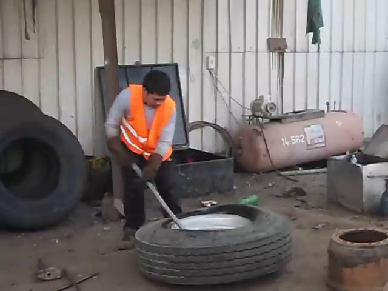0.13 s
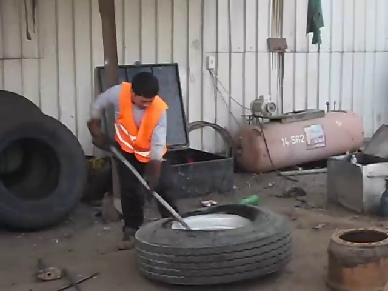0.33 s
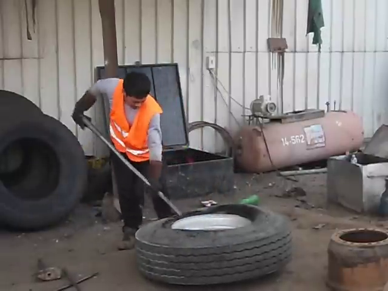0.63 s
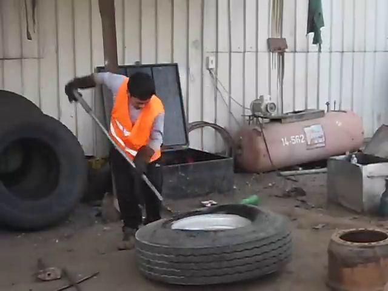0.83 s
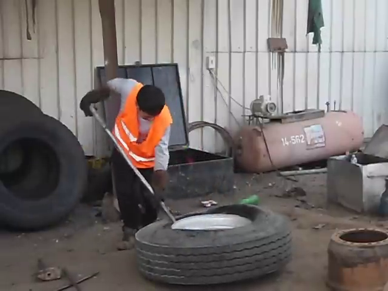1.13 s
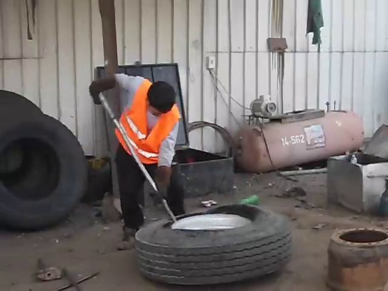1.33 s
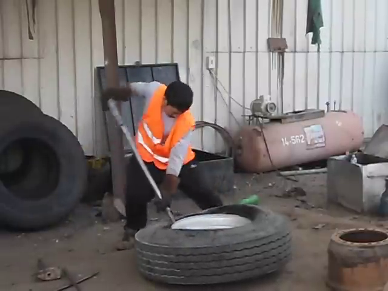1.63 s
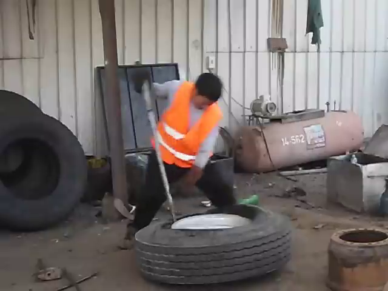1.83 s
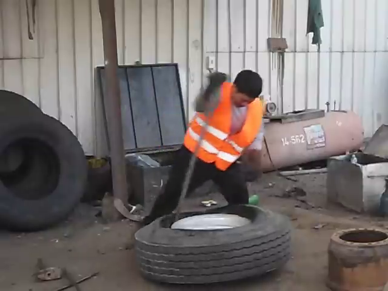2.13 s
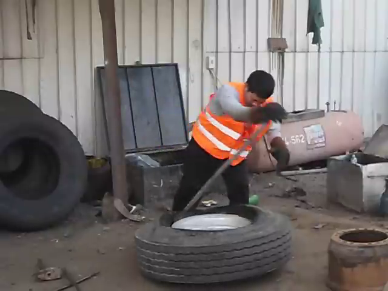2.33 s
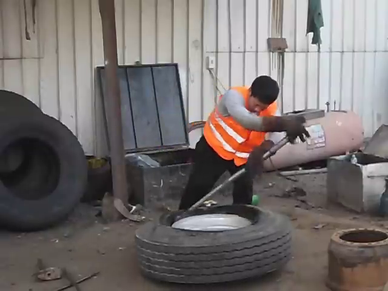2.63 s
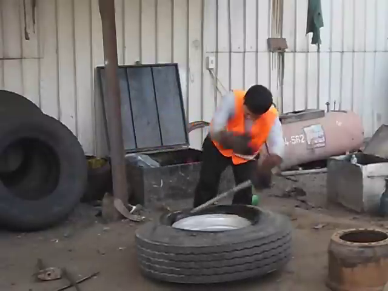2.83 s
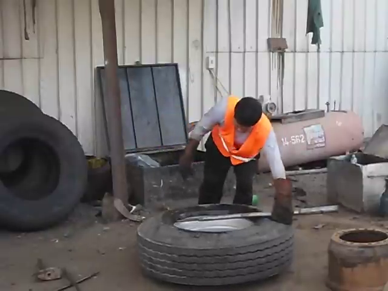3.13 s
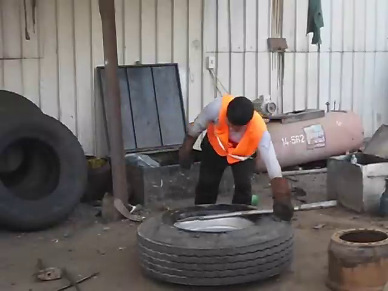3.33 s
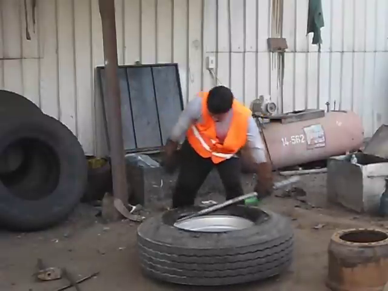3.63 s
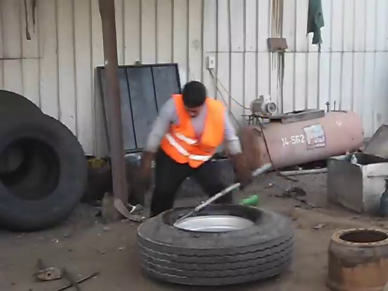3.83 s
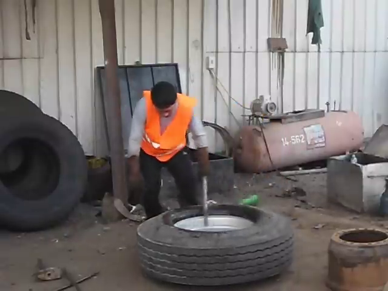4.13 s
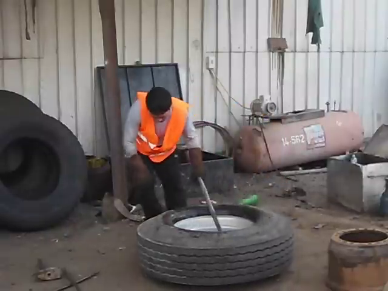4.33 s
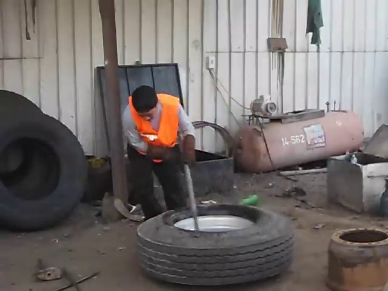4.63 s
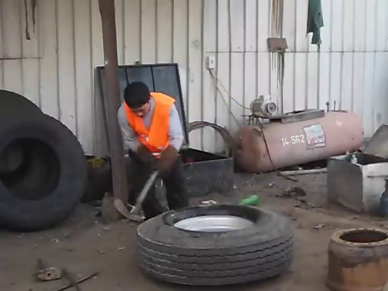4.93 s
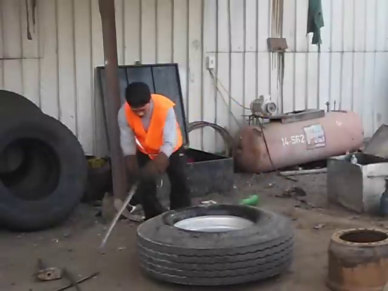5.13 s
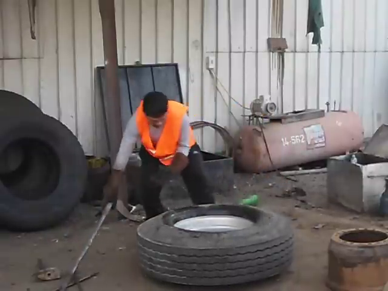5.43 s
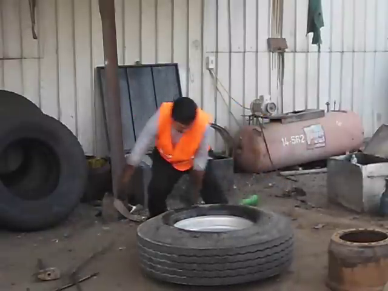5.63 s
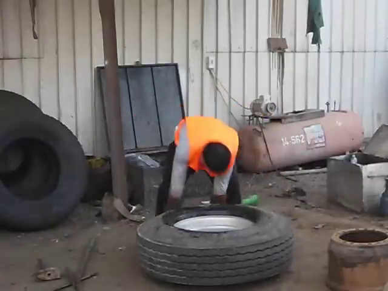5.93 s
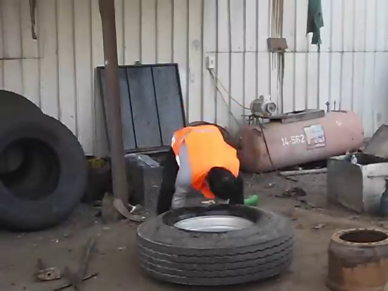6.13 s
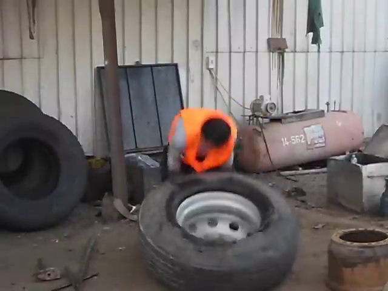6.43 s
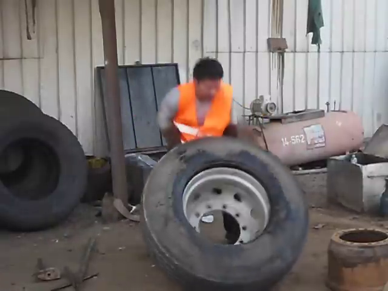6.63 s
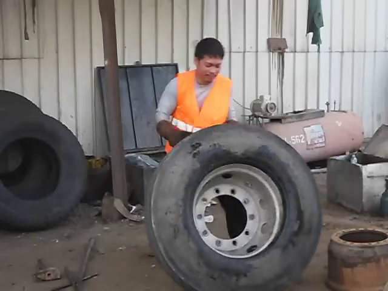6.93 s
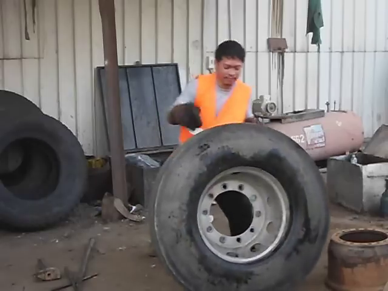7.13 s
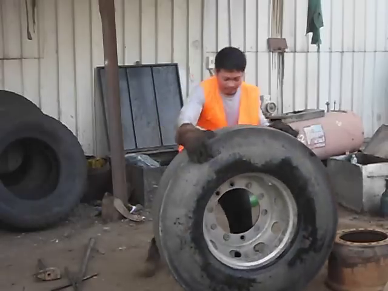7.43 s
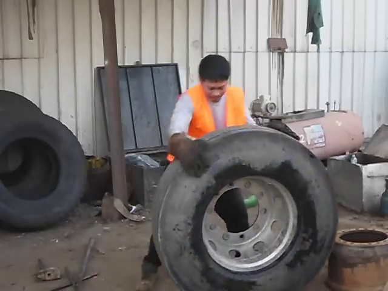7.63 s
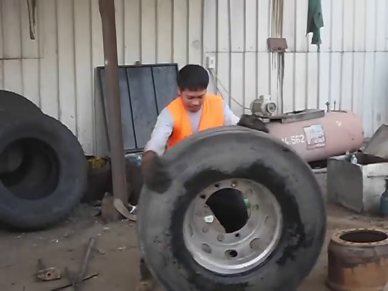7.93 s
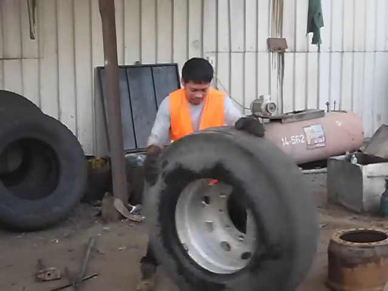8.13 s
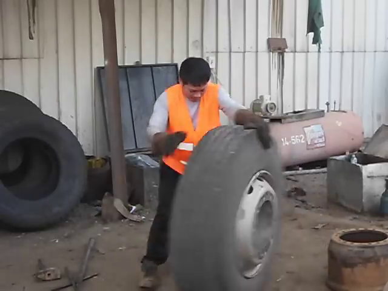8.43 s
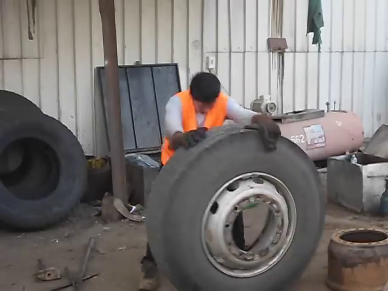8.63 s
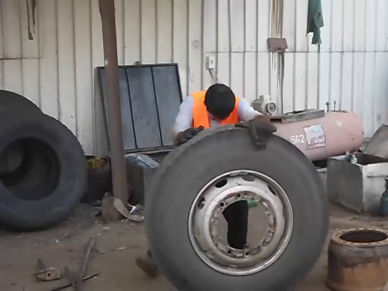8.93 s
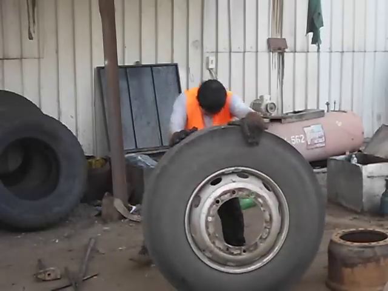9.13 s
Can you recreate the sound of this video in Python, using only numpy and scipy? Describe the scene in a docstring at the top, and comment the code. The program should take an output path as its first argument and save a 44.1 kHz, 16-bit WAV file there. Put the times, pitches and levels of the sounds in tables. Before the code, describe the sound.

Steady engine hum with a low, rough roar. First a burst of high metal squeals and ringing clanks with short rubber creaks, then separate choked metallic clacks, two moments with a deep rubbery thump. Next a long iron bar hits the ground tip first, bounces and clatters flat. Finally only engine and a few gritty tire scuffs. Outdoor workshop, muffled narrow sound, peaks distorted.

```python
"""A long steel tire iron levers a truck tire on its rim, then its tip skips on the ground and it falls ringing.
Each steel blow is a crack, a dense clatter and a ring of decaying sines; squeals are wavering sines.
The tire booms with a few low modes, and rubber scuffs, as when the wheel is swivelled on grit, are coloured noise.
An engine drones throughout, made of steady tones and a noise roar. The dull microphone overloads."""
import sys
import numpy as np
from scipy import signal
from scipy.fft import rfft, irfft, next_fast_len
from scipy.io import wavfile

SR = 44100
rng = np.random.default_rng(int(sys.argv[2]) if len(sys.argv) > 2 else 0)


def wav_out(sig):
    """Save sig, one row per channel (or a flat mono array), as 16-bit PCM at SR to the path in sys.argv[1]."""
    wavfile.write(sys.argv[1], SR, np.round(np.clip(np.atleast_2d(sig).T, -1, 1) * 32767).astype(np.int16))


N = 408807
T = np.arange(N) / SR


def undb(db):
    """Decibels to gain."""
    return 10 ** (np.asarray(db) / 20)


def unit(x):
    """Scale to rms 1."""
    return x / np.sqrt(np.mean(x ** 2))


def fade(t, t60):
    """Free decay, 60 dB in t60 seconds."""
    return np.exp(-np.log(1000) * t / t60)


def add(out, start, sound):
    """Mix a sound in at a time in seconds."""
    i = max(int(start * SR), 0)
    out[i:i + len(sound)] += sound[:N - i]


def colour(x, points):
    """Give a sound the spectrum of (Hz, dB) points, at rms 1."""
    hz, db = np.transpose(points)
    f = np.maximum(np.fft.rfftfreq(len(x), 1 / SR), 1)
    gain = undb(np.interp(np.log(f), np.log(hz), db))
    return unit(irfft(rfft(x) * gain, len(x)))


def noise(points, size):
    """Coloured noise."""
    return colour(rng.standard_normal(next_fast_len(size)), points)[:size]


def walk(rate, size=N):
    """Smooth chance, with a new random target rate times a second; spread about 1.3."""
    steps = rng.standard_normal(int(size / SR * rate) + 2)
    return 1.55 * np.interp(T[:size] * rate, np.arange(len(steps)), steps)


def engine_cycle():
    """The engine's running count of cycles, as its speed wanders slightly."""
    cycle_hz = 12.905
    return np.cumsum(cycle_hz * (1 + 0.002044 * walk(3))) / SR


# Steady tones of the engine.
# Each row: pitch as a multiple of the cycle rate, middle level in dB (rms).
ENGINE_TONES = [(2, -38.5), (4, -34), (5, -26.5), (6, -30.5), (8, -26.5), (9, -34), (12, -31), (15, -44.5),
                (16, -20.5), (24, -39), (28, -33)]


def engine(cycle):
    """All tones follow the same wandering speed; each wavers in level by itself."""
    out = np.zeros(N)
    for multiple, db in ENGINE_TONES:
        tone = np.sin(2 * np.pi * (multiple * cycle + rng.random()))
        out += np.sqrt(2) * undb(db + 0.5 * walk(3.9)) * tone
    return out


# Further steady low tones, probably the engine's.
# Each row: middle pitch in Hz, middle level in dB (rms).
FURTHER_TONES = [(32, -33), (136, -33), (254, -38), (286.5, -33), (384, -39), (402.5, -39), (448, -37),
                 (512, -41), (586.8, -39), (783, -43), (917.5, -42)]


def further_tones():
    """Each tone drifts in phase and level on its own."""
    out = np.zeros(N)
    for hz, db in FURTHER_TONES:
        level = np.sqrt(2) * undb(db + 1.5 * walk(4))
        out += level * np.sin(2 * np.pi * (hz * T + rng.random()) + .9 * walk(4))
    return out


# Colour of the yard's roar.
# Each row: pitch in Hz, relative strength in dB.
ROAR_COLOUR = [(8.2, -40.5), (14, -9), (70, -1.5), (158, -3), (209, -6), (250, -6), (916, -13.5),
               (1450, -23), (1920, -26.5), (3110, -31), (4930, -43), (5460, -51), (6200, -67), (8060, -102),
               (13600, -120)]


def roar(cycle):
    """Broad noise that throbs a little with the engine's firings, three in each cycle."""
    throb = 1 + 0.031 * np.sin(2 * np.pi * 3 * cycle)
    return noise(ROAR_COLOUR, N) * throb * undb(-14.53 + 0.1 * walk(4.8))


# A squeal bites hard, then sags to a weaker hold as the load eases.
SQUEAL_SAG_DB, SQUEAL_SAG_S = 13, 0.034
# Scale of the pitch wander; being the same in Hz, it makes low creaks rougher than high squeals.
SQUEAL_WANDER_HZ = 11
# Steel squeals and rubber creaks as the iron slides, and at 0.138 s a ringing tone of the iron.
# Each row: start in seconds, length of the hold in seconds, middle pitch in Hz, level in dB before the sag.
SQUEALS_AND_TONE = [(0.0, 0.062, 3075, -12), (0.0, 0.085, 2705, -16.5), (0.138, 0.079, 3055, -19.5),
                    (0.322, 0.055, 1680, -13), (0.325, 0.08, 4895, -27), (0.409, 0.024, 890, -13.5),
                    (5.495, 0.062, 1693, -17.5)]


def squeals_and_tone():
    """Stick-slip locks unsteadily onto one pitch, sags and rings out; the iron's tone is shaped the same way."""
    out = np.zeros(N)
    for start, length, hz, db in SQUEALS_AND_TONE:
        t = T[:int((length + .1) * SR)]
        pitch = hz + SQUEAL_WANDER_HZ * walk(167, size=len(t))
        angle = 2 * np.pi * np.cumsum(pitch) / SR
        bite = 1 - fade(t, 0.0042)
        release = fade(np.maximum(t - length, 0), 0.017)
        unsteady = undb(0.91 * walk(57, size=len(t)))
        sag_db = SQUEAL_SAG_DB * (1 - np.exp(-t / SQUEAL_SAG_S))
        add(out, start, undb(db - sag_db) * bite * release * unsteady * unit(np.sin(angle)))
    return out


# A blow's brightness tilts its spectrum about this pitch.
PIVOT_HZ = 2500
# Lighter blows are brighter: dB per octave for each dB under the hardest blow of the run.
LIGHT_BRIGHTENING = 0.089
# Level of the rebound's ring against the first touch's ring, in dB.
REBOUND_RING_DB = -2.5
# The struck spot favours the modes near one pitch.
FAVOUR_DB, FAVOUR_OCTAVES = 5, .1


def contacts(rows, bright_db, rebound_s, rebound_db, rebound_bright_db):
    """Make a touch and a quick rebound: (s, ring dB, clatter dB, brightness dB per octave, favoured Hz)."""
    hardest, out = max(row[1] for row in rows), []
    for start, db, ring_db, hz in rows:
        bright = bright_db + LIGHT_BRIGHTENING * (hardest - db)
        touch_ring_db = db + ring_db
        out.append((start, touch_ring_db, db, bright, hz))
        out.append((start + rebound_s, touch_ring_db + REBOUND_RING_DB, db + rebound_db,
                    bright + rebound_bright_db, hz))
    return out


def reach(hz, bright_db, favoured_hz):
    """How strongly a blow reaches each mode, in dB: a brightness tilt and a bump from the struck spot."""
    octaves_away = np.log2(hz / favoured_hz)
    bump = FAVOUR_DB * np.exp(-(octaves_away / FAVOUR_OCTAVES) ** 2)
    return bright_db * np.log2(hz / PIVOT_HZ) + bump


def ring(modes, events, t, sustain, flutter, flutter_hz):
    """Blows (s, dB for every mode) feed energy to modes (Hz, t60, dB); random flutter acts as wall echoes."""
    out = np.zeros(len(t))
    total = np.sqrt(np.sum(undb(modes[:, 2]) ** 2) / 2)
    for k, (hz, t60, db) in enumerate(modes):
        energy = np.zeros(len(t))
        for start, blow_db in events:
            age = t[:len(t) - int(start * SR)]
            swell = 1 - fade(age, 0.014)
            add(energy, start, (undb(blow_db[k]) * fade(age, t60 * sustain) * swell) ** 2)
        # The two parts of the complex flutter shake the mode's level and phase.
        echoes = flutter * (walk(flutter_hz, size=len(t)) + 1j * walk(flutter_hz, size=len(t)))
        tone = np.exp(2j * np.pi * (hz * t + rng.random()))
        wave = np.real((1 + echoes) * tone) / np.sqrt(1 + 2 * flutter ** 2)
        out += undb(db) / total * np.sqrt(energy) * wave
    return out


def clatter(points, t, patchy_db):
    """Countless weak, crowded modes: a hiss with narrow peaks and valleys."""
    size = next_fast_len(len(t))
    hz = np.fft.rfftfreq(size, 1 / SR)
    grid = np.arange(0, SR / 2, 45)
    patches = undb(patchy_db * np.interp(hz, grid, rng.standard_normal(len(grid))))
    hiss = irfft(rfft(rng.standard_normal(size)) * patches, size)
    return colour(hiss, points)[:len(t)]


# Colour of a blow's crack and clatter before its brightness tilt.
# Each row: pitch in Hz, relative strength in dB.
CLATTER_COLOUR = [(300, -25), (700, -0.5), (1100, -2), (1700, 1.5), (2600, 0.5), (3400, 0), (4000, -6.5),
                  (4800, -9.5), (5600, -30)]


def blows(events, modes, sustain, flutter, clatter_t60, crack_db):
    """Blows on steel: each gives a short crack, a dense clatter and a longer ring, tilted by brightness."""
    out, modes, first = np.zeros(N), np.array(modes), events[0][0]
    t = T[:int((events[-1][0] - first + .7) * SR)]
    strikes = []
    for start, ring_db, _, bright_db, hz in events:
        strikes.append((start - first, ring_db + reach(modes[:, 0], bright_db, hz)))
    add(out, first, ring(modes, strikes, t, sustain, flutter, flutter_hz=54.0))
    t = T[:SR // 2]
    for start, _, clatter_db, tilt_db, _ in events:
        points = [(hz, db + tilt_db * np.log2(hz / PIVOT_HZ)) for hz, db in CLATTER_COLOUR]
        crack = undb(crack_db) * noise(points, len(t)) * fade(t, 0.018)
        hiss = clatter(points, t, patchy_db=7.5) * fade(t, clatter_t60)
        add(out, start, undb(clatter_db) * (crack + hiss))
    return out


# Modes of the iron, also used by the tip skips and falls; where it is hit decides which modes speak.
# Each row: pitch in Hz, time to fade 60 dB in seconds before the sustain factor,
# then relative strength in dB when it hits the rim, when its tip hits the ground, and when it falls flat.
IRON_MODES = [(1069, .4, -13, -11, -6), (1150, .6, -4, -10, -1), (1226, .45, -25, -25, -10),
              (1346, .4, -7, -22, -22), (1388, .35, -20, -13, -11), (1530, .45, -16, -13, -22),
              (1686, .45, -7, -18, -13), (1872, .4, -22, -18, -3), (2168, .45, -5, -16, -2),
              (2230, .4, -20, -11, -12), (2538, .38, -14, 0, -4), (2612, .42, -14, -9, 0),
              (2662, .35, -18, -10, -8), (2839, .45, -10, -2, -5), (2908, .45, -25, -12, -10),
              (3048, .5, -3, -7, -6), (3223, .45, -20, -16, -8), (3328, .5, -20, -2, -3),
              (3395, .45, -14, -12, -8), (3520, .45, -15, -18, -5), (3579, .3, -25, -8, -15),
              (3769, .38, -26, -9, -20), (4100, .4, -25, -16, -13), (4143, .38, -20, -22, -12),
              (4358, .38, -25, -7, -15), (4406, .6, -23, -12, -16), (4635, .38, -28, -14, -14),
              (4775, .35, -19, -13, -13), (4886, .35, -16, -15, -12), (5296, .75, -38, -27, -25),
              (5727, .95, -48, -33, -35)]
# The iron clanks on the rim.
# Each row: start in seconds, clatter level in dB, ring against clatter in dB, favoured pitch in Hz.
RIM_CLANKS = [(0.070, -9.5, -5.5, 3050), (0.165, -20, -5, 3050), (0.250, -23.5, -11, 2170),
              (0.317, -16, -3, 2250), (0.372, -24.5, 1.5, 1090)]


def rim_clanks():
    """Hits on the rim wake the iron's modes by their rim strengths."""
    clanks = contacts(RIM_CLANKS, bright_db=-3.5, rebound_s=0.014, rebound_db=-1, rebound_bright_db=0.0)
    modes = np.array(IRON_MODES)[:, [0, 1, 2]]
    return blows(clanks, modes, sustain=1.0, flutter=0.58, clatter_t60=0.31, crack_db=-21)


# Colour of a scuff.
# Each row: pitch in Hz, relative strength in dB.
SCUFF_COLOUR = [(400, -10), (750, -4), (950, 6), (1300, -1), (1900, -11.5), (3200, -14.5), (4500, -23),
                (5600, -37.5)]
# Rubber scuffs.
# Each row: start in seconds, length setting in seconds (longer fades later and slower), level in dB.
SCUFFS = [(0.359, 0.11, -17.5), (0.412, 0.042, -14.5), (7.911, 0.026, -19), (7.955, 0.5, -23.5),
          (8.387, 0.072, -16.5), (8.542, 0.038, -22.5), (8.589, 0.021, -18)]


def scuffs():
    """Rubber rubs in dense uneven slips; a fading tail stands for the walls."""
    out = np.zeros(N)
    for start, length, db in SCUFFS:
        t = T[:SR // 2]
        # About 2500 random slips a second.
        slips = rng.standard_normal(len(t)) * (rng.random(len(t)) < 2500 / SR)
        tail = fade(np.maximum(t - length / 2, 0) / (length + .03), 4.5)
        push = (1 - fade(t, .025)) * tail
        add(out, start, undb(db) * push * colour(slips, SCUFF_COLOUR))
    return out


# The bead jumps over the flange and the tire booms.
# Each row: jump time in seconds (the boom comes 0.012 s later), strength of the push in dB.
THUMPS = [(0.945, -6), (0.972, -5), (2.911, -2)]
# Modes of the tire.
# Each row: pitch in Hz, time to fade 60 dB in seconds before the sustain factor, relative strength in dB.
TIRE_MODES = [(69, 0.23, 10.5), (96.7, 0.18, -7), (123.4, 0.43, 2.5), (163.7, 0.42, 6)]


def tire_booms():
    """When the bead gives, the air-filled carcass booms on its low modes."""
    out = np.zeros(N)
    for start, db in THUMPS:
        push = [(0.012, np.full(len(TIRE_MODES), db))]
        boom = ring(np.array(TIRE_MODES), push, T[:SR // 2], sustain=0.73, flutter=0.22, flutter_hz=24.9)
        add(out, start, boom)
    return out


# Modes of the rim, choked by the rubber.
# Each row: pitch in Hz, time to fade 60 dB in seconds before the sustain factor, relative strength in dB.
RIM_MODES = [(856, .3, -7), (1310, .3, -6), (1410, .35, -8), (1880, .22, -10), (2160, .2, -9),
             (2370, .33, -2), (2550, .25, 0), (2670, .25, -2), (2820, .35, -2), (3050, .22, -7),
             (3370, .2, -6), (3480, .25, -9), (3880, .25, -10), (4120, .22, -8), (4450, .22, -9),
             (5330, .25, -19), (5620, .25, -25)]
# The loaded iron slips on the rim.
# Each row: start in seconds, clatter level in dB, ring against clatter in dB, favoured pitch in Hz.
SLIPS = [(0.950, -18.5, -4, 3400), (0.974, -5, -8.5, 2820), (1.437, -22.5, -14, 3400),
         (1.655, -17.5, -9.5, 2550), (2.918, -29, -14, 3900), (2.955, -15, -9.5, 3400),
         (3.938, -16.5, -6.5, 3100)]


def iron_slips():
    """The loaded iron slips with a dry clack, which rings the choked rim."""
    slips = contacts(SLIPS, bright_db=0.3, rebound_s=0.014, rebound_db=-10.5, rebound_bright_db=-8)
    out = np.zeros(N)
    for slip in slips:
        out += blows([slip], RIM_MODES, sustain=1.15, flutter=.5, clatter_t60=.24, crack_db=-6)
    return out


# The iron's tip skips over the ground.
# Each row: start in seconds, clatter level in dB, ring against clatter in dB, favoured pitch in Hz.
TIP_SKIPS = [(5.142, -5.5, -5, 3350), (5.212, -15.5, 2.5, 2550), (5.268, -14, -0.5, 3400),
             (5.300, -21, 0.5, 2840), (5.487, -31, 1, 3330)]


def tip_skips():
    """Hits at the tip wake the iron's modes by their tip strengths."""
    skips = contacts(TIP_SKIPS, bright_db=-3.5, rebound_s=.019, rebound_db=-3.5, rebound_bright_db=7.0)
    modes = np.array(IRON_MODES)[:, [0, 1, 3]]
    return blows(skips, modes, sustain=.88, flutter=.5, clatter_t60=.26, crack_db=-12)


# The iron falls flat and bounces.
# Each row: start in seconds, clatter level in dB, ring against clatter in dB, favoured pitch in Hz.
FALLS = [(5.612, -5, -3, 1150), (5.658, -9.5, 2.5, 2610), (5.793, -10.5, 0, 3200),
         (5.843, -13.5, 1.5, 3400), (5.908, -19.5, -0.5, 3400)]


def falls():
    """Flat landings wake the iron's modes by their flat strengths."""
    landings = contacts(FALLS, bright_db=-2.0, rebound_s=.009, rebound_db=-1.5, rebound_bright_db=4)
    modes = np.array(IRON_MODES)[:, [0, 1, 4]]
    return blows(landings, modes, sustain=.95, flutter=.5, clatter_t60=.28, crack_db=-10)


def scene():
    """All sources at one microphone."""
    cycle = engine_cycle()
    background = engine(cycle) + further_tones() + roar(cycle)
    tire = scuffs() + tire_booms()
    levering = squeals_and_tone() + rim_clanks() + iron_slips()
    dropping = tip_skips() + falls()
    return (background + tire + levering + dropping)[None]


def record(dry):
    """A narrow-band microphone channel, then overload with a tight knee, which alone makes the top treble."""
    mic_hz, top_hz = 5760, 15850
    clip, knee = .74, 18  # level where peaks flatten; a higher knee bends more sharply
    dull = signal.sosfilt(signal.butter(28, mic_hz, fs=SR, output="sos"), dry)
    flat_topped = dull / (1 + np.abs(dull / clip) ** knee) ** (1 / knee)
    return signal.sosfiltfilt(signal.ellip(10, .1, 60, top_hz, fs=SR, output="sos"), flat_topped)


dry = scene()
out = record(dry)
wav_out(out)
```